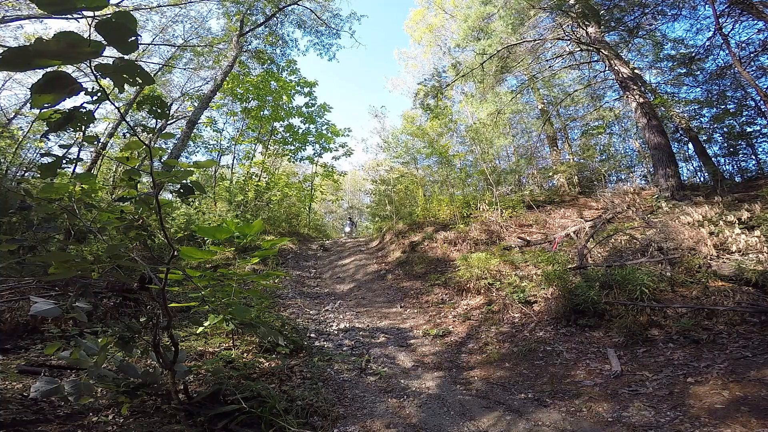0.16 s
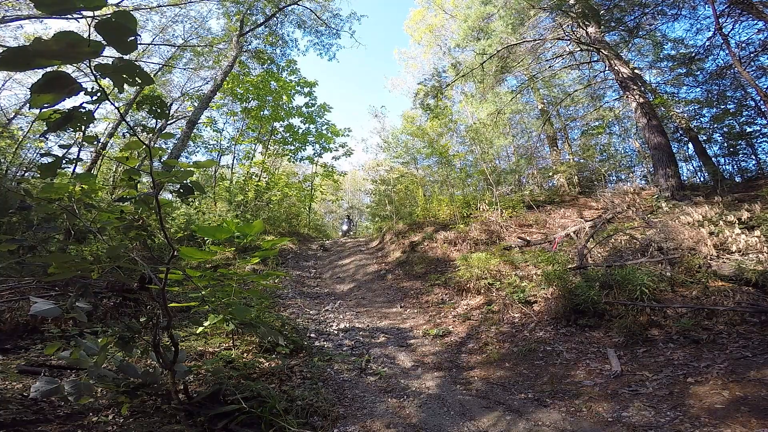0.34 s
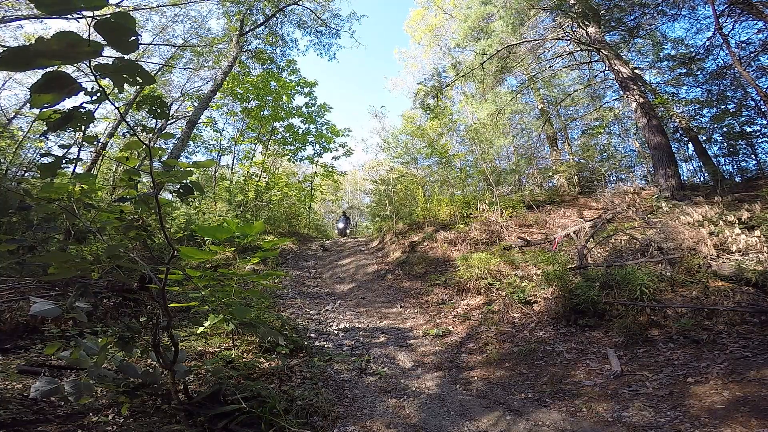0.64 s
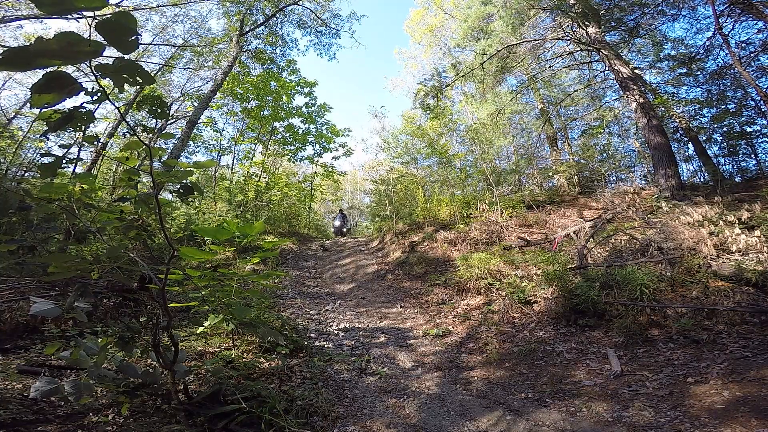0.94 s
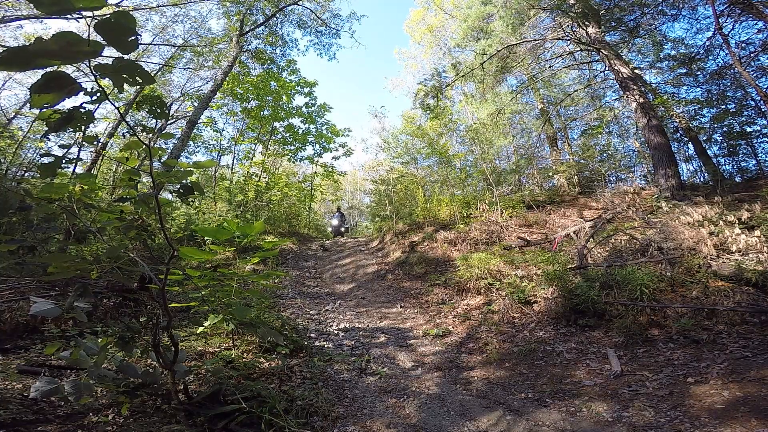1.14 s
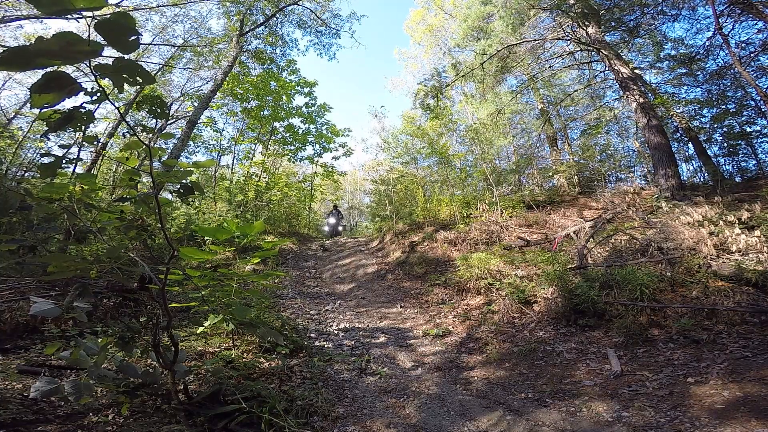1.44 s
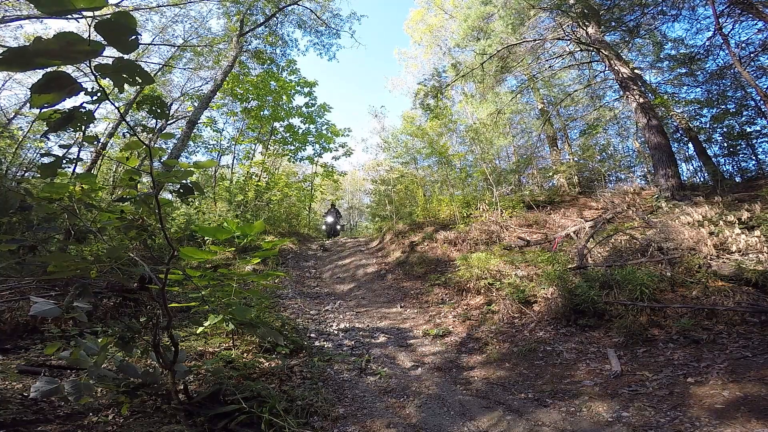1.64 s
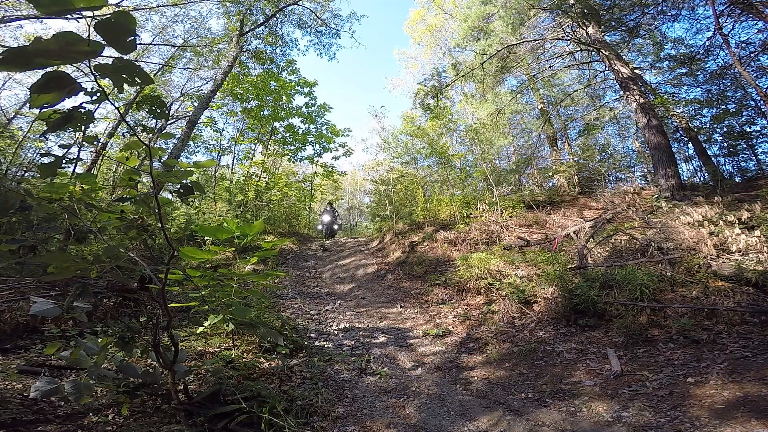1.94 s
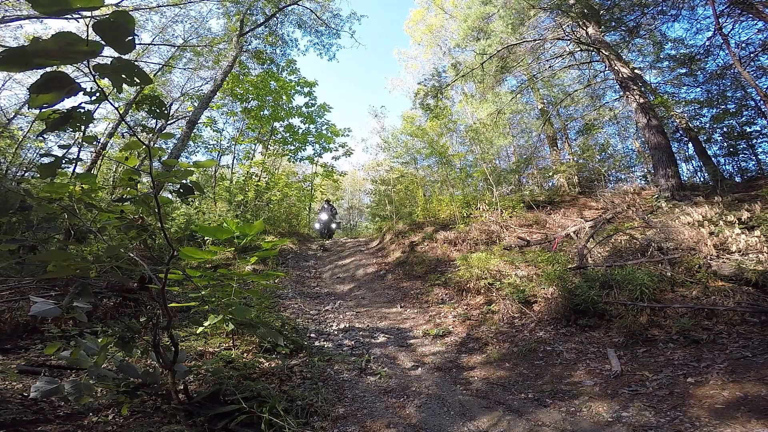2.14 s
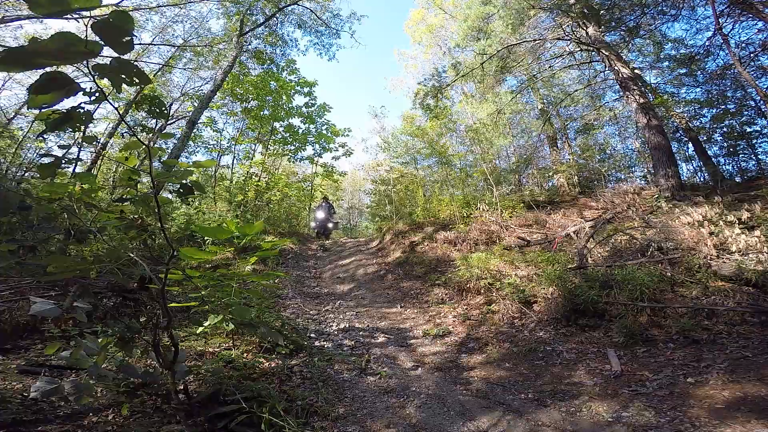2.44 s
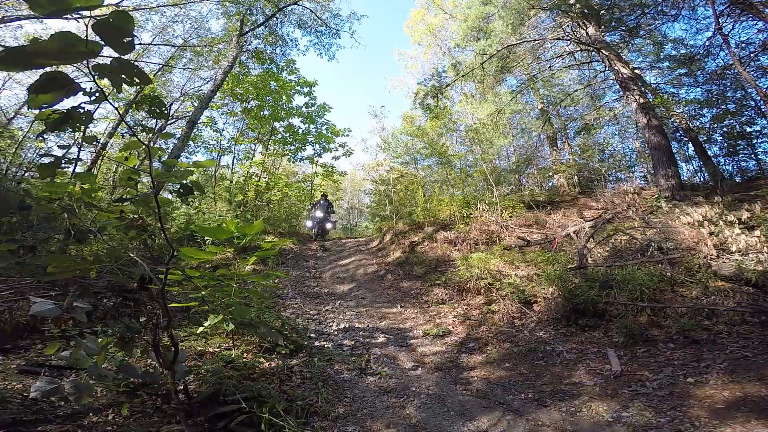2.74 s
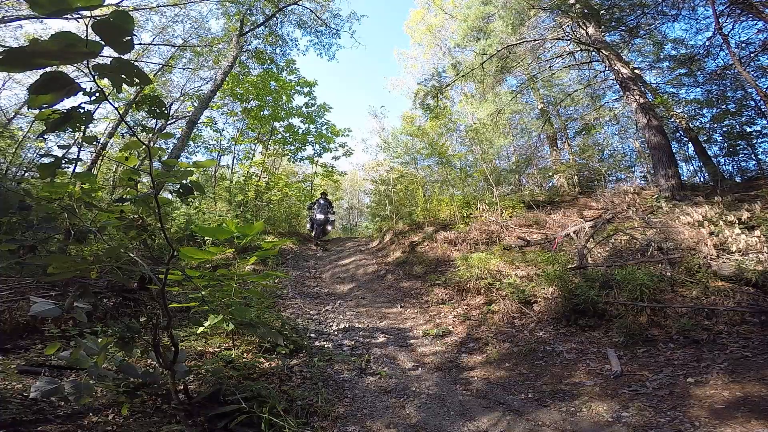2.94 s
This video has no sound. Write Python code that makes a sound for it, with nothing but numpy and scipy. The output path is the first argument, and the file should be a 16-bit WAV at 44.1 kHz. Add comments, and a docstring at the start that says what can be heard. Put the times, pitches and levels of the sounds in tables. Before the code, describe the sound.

A four-stroke motorcycle approaches a stationary stereo microphone on a woodland dirt trail. Its engine note falls quickly over the first 0.5 seconds to a low, thudding putter, about twenty beats a second, growing stronger. Mechanical hiss and tyre crunch rise from 1 second. Sharp stone clicks cluster at 2.0-2.1; the engine revs slightly to 2.7, then slows, with duller knocks and another crack near 3.0, lightly echoed by trees.

```python
"""A four-stroke trail motorcycle coasts in up a dirt track in the woods, nearing two microphone ports, then pulls.
Each engine cycle has an exhaust beat, a decaying ring; half a cycle on come a weaker ring, an intake gulp
and a valve tick. Mechanical hiss and tyre crunch, both shaped noise, grow as it nears.
From 1.7 s on, grit, stones and sticks clack as short cracks of noise, echoed by the trees; the engine revs
briefly near 2.7 s, then slows again."""
import sys
import numpy as np
from scipy import signal
from scipy.fft import rfft, irfft, next_fast_len
from scipy.io import wavfile
from scipy.ndimage import uniform_filter1d

SR = 44100
rng = np.random.default_rng(int(sys.argv[2]) if len(sys.argv) > 2 else 0)


def to_wav(sig):
    """Store sig (one row per channel, or 1-D mono) as 16-bit WAV at the path in sys.argv[1].

    Samples outside -1..1 are clipped; the rate is SR.
    """
    pcm = np.clip(np.atleast_2d(sig), -1, 1) * 32767
    pcm = np.round(pcm).astype(np.int16)
    wavfile.write(sys.argv[1], SR, pcm.T)  # frames by channels


def decibels_to_gain(level_db):
    """Convert a level in decibels to a linear amplitude gain (20 dB per decade)."""
    exponent = np.asarray(level_db, float) / 20
    return 10 ** exponent


N = 136710  # length [samples]
START_CYCLE = 0.457  # position in the engine cycle at time 0 [cycles]

# Levels of the machine's noises: (time [s], hiss [dB], growl [dB], rumble [dB])
NOISE_LEVEL = [(0, -43.5, -48.5, -31.5), (.1, -47.5, -52, -38), (.5, -48.5, -53, -39),
               (1, -46.5, -51.5, -41.5), (1.5, -44.5, -49.5, -38.5), (2, -42, -46.5, -39.5),
               (2.45, -41, -46.5, -36.5), (2.82, -39, -44.5, -35), (3.0, -40, -40.5, -39)]


def evened(x):
    """Normalises the energy: scales to rms 1."""
    return x / np.sqrt(np.mean(x ** 2) + 1e-20)


def read(points, hz):
    """Interpolates a spectrum along a logarithmic frequency axis."""
    f, value = np.transpose(points)
    return np.interp(np.log(hz + 1), np.log(f + 1), value)


def curve(rows, column):
    """Interpolates one column of a time table linearly to every sample."""
    rows = np.array(rows)
    return np.interp(np.arange(N) / SR, rows[:, 0], rows[:, column])


def add(mix, s, sound):
    """Superposes a sound on the mix from time s [s]."""
    part = mix[round(s * SR):][:len(sound)]
    part += sound[:len(part)]


def cycles():
    """Phase is the integral of frequency: engine cycles counted up to each sample."""
    # Engine speed: (time [s], speed [cycles per s])
    speed = [(0, 37.4), (.12, 32.72), (.25, 27.82), (.4, 23.06), (.62, 21.4), (.85, 20.48), (1, 21.7),
             (1.15, 20.23), (1.4, 20.49), (1.52, 19.76), (1.62, 20.68), (1.9, 20.12), (2.1, 20.05),
             (2.2, 21.97), (2.28, 21.95), (2.4, 23.24), (2.7, 24.9), (2.8, 24.03), (2.86, 21.69),
             (2.97, 20.4), (3.1, 19.27)]
    return START_CYCLE + np.cumsum(curve(speed, column=1)) / SR


def noise(spectrum, patch_db):
    """Filtered Gaussian noise: two unrelated signals of one spectrum, with patches in time and frequency."""
    frames, hz = N // 256 + 5, np.fft.rfftfreq(1024, 1 / SR)
    real, imaginary, grain = rng.standard_normal((3, 2, len(hz), frames))
    patches = uniform_filter1d(grain[0], size=10, axis=0)  # across frequency
    patches = evened(uniform_filter1d(patches, size=8, axis=1))  # across time
    gain = decibels_to_gain(read(spectrum, hz)[:, None] + patch_db * patches)
    sound = signal.istft((real + 1j * imaginary) * gain, nperseg=1024, noverlap=768)[1]
    return evened(sound[:, :N])


def still_woods():
    """Stationary ambient noise: the steady air of the woods."""
    # Spectrum of the air: (frequency [Hz], density [dB per Hz])
    air = [(2000, -3.5), (7000, 7), (10300, -6), (11300, -13), (14000, -29), (14800, -40)]
    return decibels_to_gain(-54.5) * noise(air, patch_db=0.2)


def rumble():
    """Low-passed noise, loudest at the start, sagging until 1 s, swelling again around the rev."""
    # Spectrum of the rumble: (frequency [Hz], density [dB per Hz])
    low = [(10, 4), (60, 6.5), (120, -1), (240, -3), (330, -44.5)]
    return decibels_to_gain(curve(NOISE_LEVEL, column=3)) * noise(low, patch_db=0.5)


def growl():
    """Amplitude modulation: low-mid noise swelling twice each engine cycle."""
    # Spectrum of the growl: (frequency [Hz], density [dB per Hz])
    low_mid = [(200, -37), (300, -0.5), (400, 2.5), (550, 1), (800, -5.5), (1300, -8), (2000, -51)]
    rasp_db, rasp_at = 2, 0.2  # swing either way [dB], place of a crest [cycles]
    rasp = decibels_to_gain(rasp_db * np.cos(4 * np.pi * (cycles() - rasp_at)))
    return decibels_to_gain(curve(NOISE_LEVEL, column=2)) * noise(low_mid, patch_db=0.5) * rasp


def hiss_and_crunch():
    """Modulated noise: mechanical hiss swells each cycle, and random impacts of the tyres add decaying bursts."""
    # Spectrum of the hiss: (frequency [Hz], density [dB per Hz])
    treble = [(600, -4), (900, -1), (1300, 0.5), (1700, 1.5), (2040, -2.5), (2400, 1), (2900, -0.5),
              (4000, 0.5), (5700, -3), (8200, -17), (11000, -36), (14000, -63)]
    pulse_db, pulse_at = 0.5, 0.59  # swing either way [dB], place of the crest [cycles]
    crunch_per_s, crunch_db, crunch_spread_db = 390, -18, 0.5  # dB relative to the steady hiss
    burst_s = 0.0088  # decay of one burst to 1/e [s]
    pulse = decibels_to_gain(pulse_db * np.cos(2 * np.pi * (cycles() - pulse_at)))
    strength = decibels_to_gain(crunch_db + crunch_spread_db * np.minimum(rng.exponential(1, N), 4))
    hits = strength * (rng.random(N) < crunch_per_s / SR)
    crunch = 1 + signal.oaconvolve(hits, np.exp(-np.arange(600) / SR / burst_s))[:N]
    return decibels_to_gain(curve(NOISE_LEVEL, column=1)) * noise(treble, patch_db=0.5) * evened(pulse * crunch)


def trees(x):
    """Diffuse reverberation: scattered echoes off trunks and leaves, as two unrelated tails."""
    # Decay of the echoes: (frequency [Hz], time to fall by 60 dB [s])
    decay = [(500, 0.78), (6000, 0.54), (14000, 0.39)]
    taps = np.zeros((2, SR))
    # one echo at random in every 20 samples, of either sign
    at = np.arange(200, SR - 20, 20) + rng.integers(0, 20, (2, (SR - 201) // 20))
    np.put_along_axis(taps, at, rng.choice([-1., 1.], at.shape), 1)
    hz, t, z = signal.stft(taps, SR, nperseg=256)
    tail = signal.istft(z * decibels_to_gain(-60 * t / read(decay, hz)[:, None]), SR, nperseg=256)[1]
    tail = tail / np.linalg.norm(tail[0])
    return decibels_to_gain(-6) * signal.fftconvolve(x[None], tail, axes=1)[:, :N]


def knocks():
    """Damped impacts: each knock is a short crack of noise coloured around its pitch."""
    # Knocks of grit, stones and sticks: (time [s], level [dB], pitch [Hz], time to fall by 60 dB [s])
    impacts = [(1.755, -40, 504, 0.2), (1.941, -29, 2050, 0.012), (1.9903, -23.5, 5000, 0.011),
               (1.9937, -18.5, 5000, 0.032), (2.0117, -16.5, 5900, .007), (2.0597, -23, 4700, 0.0099),
               (2.0867, -35, 1600, 0.033), (2.1015, -24.5, 4430, 0.0068), (2.2706, -37, 3370, 0.12),
               (2.5376, -29.5, 1450, 0.016), (2.662, -30, 470, 0.045), (2.744, -27.5, 690, 0.024),
               (2.878, -26, 720, 0.018), (2.989, -30.5, 1250, 0.031), (2.964, -24, 1130, 0.042),
               (3.0, -32.5, 390, 0.19), (3.0283, -20.5, 4000, 0.015), (3.033, -37, 4300, 0.0071)]
    # Spectrum of a knock: (frequency [times its pitch], density [dB per Hz])
    colour = [(.3, -18), (.7, -5), (1, 0), (1.3, -1), (1.8, -11), (2.8, -21), (3.1, -45)]
    out, t, hz = np.zeros(N), np.arange(2048) / SR, np.fft.rfftfreq(2048, 1 / SR)
    for s, db, pitch_hz, t60 in impacts:
        spectrum = [(ratio * pitch_hz, density) for ratio, density in colour]
        crack = irfft(rfft(rng.standard_normal(2048)) * decibels_to_gain(read(spectrum, hz)))
        fade = decibels_to_gain(-60 * t / t60) * np.minimum(t / 0.00063, 1)  # onset of 0.63 ms
        crack = fade * crack
        # the level is that of noise of rms 1 under the same fade
        add(out, s, decibels_to_gain(db) * crack * np.linalg.norm(fade) / np.linalg.norm(crack))
    return out


def beats(at, column, scatter_db, shape):
    """Periodic excitation: one pulse each cycle at a share of it, sized by a load column and chance."""
    # Peak levels of the pulses: (time [s], exhaust beat [dB], weaker ring half a cycle on [dB],
    # low thump [dB], intake gulp [dB], valve tick [dB])
    load = [(0, -26, -30, -30, -24, -65), (.045, -51, -50, -49, -33, -68),
            (.072, -21.5, -34, -28, -17, -62), (.11, -34.5, -36.5, -34.5, -24.5, -68),
            (.31, -29.5, -25, -28, -31, -73), (.345, -27, -35, -32, -25, -58),
            (.43, -23.5, -48, -26, -25.5, -62), (.62, -22.5, -31.5, -25.5, -30, -50),
            (.9, -21.5, -33.5, -25.5, -23, -49.5), (1.3, -20, -31.5, -24.5, -22, -43),
            (1.53, -19, -27, -27, -27, -47), (1.8, -16.5, -29, -26, -23.5, -36),
            (2.1, -17.5, -25, -27.5, -24.5, -46), (2.3, -16, -45, -18, -17, -40.5),
            (2.75, -16, -55, -17.5, -18, -46), (2.81, -20.5, -45, -22, -21, -59),
            (2.87, -15, -22.5, -16.5, -18.5, -39), (3.05, -13, -26.5, -22.5, -18, -40)]
    train = np.diff(np.floor(cycles() - at), prepend=np.floor(START_CYCLE - at))
    size = decibels_to_gain(curve(load, column) + scatter_db * rng.standard_normal(N))
    return signal.oaconvolve(train * size, shape / abs(shape).max())[:N]


def silencer_ring(t):
    """Damped resonance whose pitch drops quickly, then settles."""
    ring_hz, late_s = 104.4, 0.0004  # settled pitch, delay
    drop_cycles, drop_s = 0.29, 0.0024  # cycles gained by the drop, its time constant
    ring_s, rise = 0.014, 0.85  # width of the decay [s], power of time in the onset
    u = np.maximum(t - late_s, 0)
    turns = ring_hz * u + drop_cycles * (1 - np.exp(-u / drop_s))
    return u ** rise * np.exp(-(u / ring_s) ** 2) * np.sin(2 * np.pi * turns)


def low_thump(t):
    """Heavily damped low oscillation, delayed after its excitation."""
    thump_hz, thump_s, late_s = 75, 0.0043, 0.0097  # pitch, decay to 1/e, delay
    u = np.maximum(t - late_s, 0)
    return u * np.exp(-u / thump_s) * np.sin(2 * np.pi * thump_hz * u)


def intake_gulp(t):
    """Pressure pulse: a Gaussian bump stripped of its lowest frequencies."""
    late_s, width_s, low_hz = 0.00996, 0.002, 49  # centre, standard deviation, high-pass corner
    bump = np.exp(-0.5 * ((t - late_s) / width_s) ** 2)
    return signal.lfilter(*signal.butter(2, low_hz, "high", fs=SR), bump)


def valve_tick(t):
    """Struck resonance: a decaying tone with a soft onset."""
    tick_hz, t60, onset_s = 2350, 0.038, 0.0018
    return (1 - np.exp(-t / onset_s)) * decibels_to_gain(-60 * t / t60) * np.sin(2 * np.pi * tick_hz * t)


def engine():
    """Superposed pulse trains: beat and thump on the exhaust; ring, thump, gulp and tick half a cycle on."""
    t = np.arange(3500) / SR
    ring, thump = silencer_ring(t), low_thump(t)
    exhaust_beat = beats(0, 1, 1, ring)
    half_cycle_ring = beats(0.5, 2, 1, ring)
    thumps = beats(0, 3, 1, thump) + beats(0.5, 3, 1, thump)
    gulp = beats(0.5, 4, 1, intake_gulp(t))
    tick = beats(0.51, 5, 1.5, valve_tick(t))
    return exhaust_beat + half_cycle_ring + thumps + gulp + tick


def scene():
    """Partial coherence: row 0 is what both ports share, row 1 the diffuse part that makes them differ."""
    hits = knocks()
    diffuse = still_woods() + rumble() + growl() + hiss_and_crunch() + trees(hits)
    return np.array([engine() + hits + diffuse[0], diffuse[1]])


def low_pass(x):
    """Removes everything above the highest recorded frequency."""
    return signal.sosfilt(signal.butter(12, 14890, fs=SR, output="sos"), x)


def record(dry):
    """Interchannel phase, level and coherence: two ports with their own lead and balance by frequency."""
    # Likeness of the ports: (frequency [Hz], share of the right port taken from row 0 [amplitude ratio])
    likeness = [(180, 0.77), (400, 0.48), (800, 0.6), (3000, 0.78), (9000, 0.21), (14000, 0.087)]
    # Phase lead of the left port: (frequency [Hz], lead [radians])
    lead = [(60, .1), (260, .3), (690, 3.4), (1720, 5.9), (2670, 5.3), (3960, 6.1), (7240, 5.5),
            (14000, 6.4)]
    # Balance of the ports: (frequency [Hz], left minus right [dB])
    balance = [(40, -.6), (200, 1.5), (370, 5), (680, 4.4), (1250, -1.5), (2310, 1.6), (5500, 2.5),
               (9000, -6), (14300, -2)]
    size = next_fast_len(N + 4096)
    hz, (one, other) = np.fft.rfftfreq(size, 1 / SR), rfft(dry, size)
    one = one * hz / np.hypot(hz, 8)  # high-pass at 8 Hz, below hearing
    same = np.clip(read(likeness, hz), 0, 1)
    tilt = decibels_to_gain(read(balance, hz) / 2)
    left = one * tilt * np.exp(1j * read(lead, hz))
    right = (same * one + np.sqrt(1 - same ** 2) * other) / tilt
    ports = irfft(np.array([left, right]), size)[:, :N]
    return low_pass(ports)


dry = scene()
out = record(dry)
to_wav(out)
```